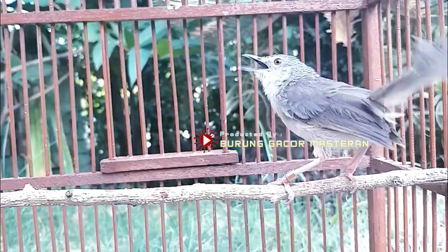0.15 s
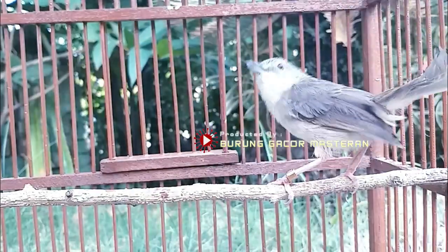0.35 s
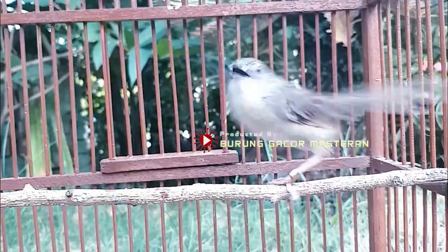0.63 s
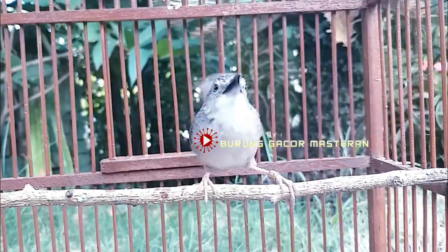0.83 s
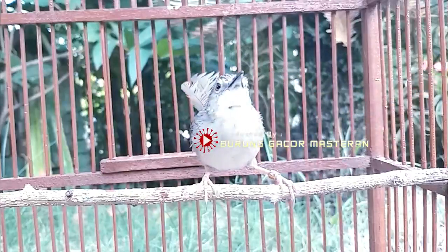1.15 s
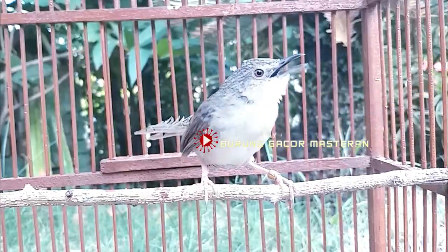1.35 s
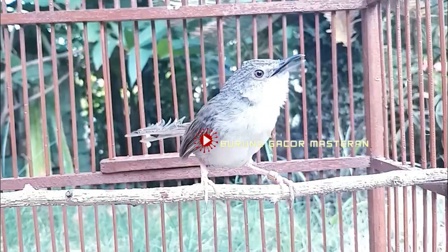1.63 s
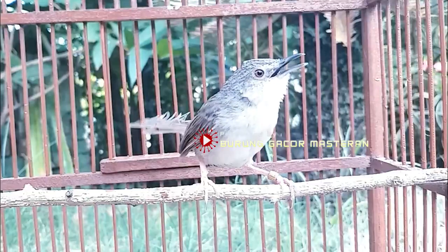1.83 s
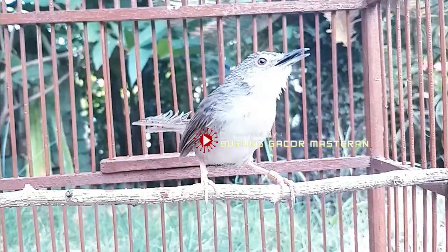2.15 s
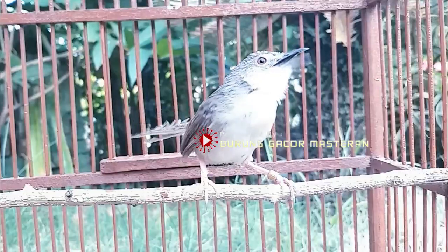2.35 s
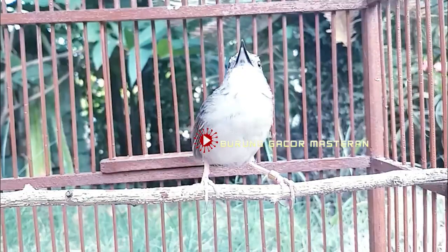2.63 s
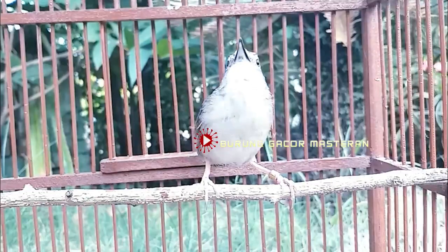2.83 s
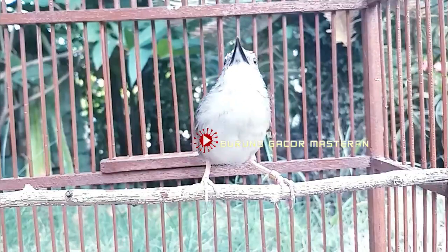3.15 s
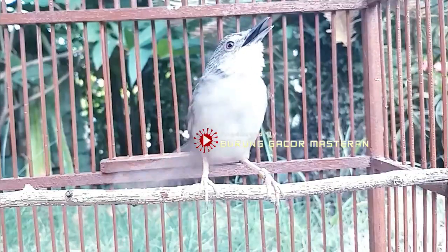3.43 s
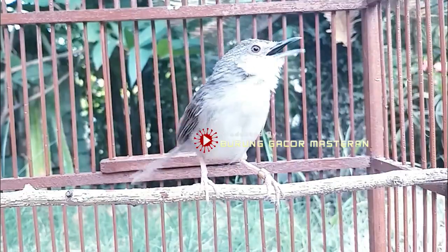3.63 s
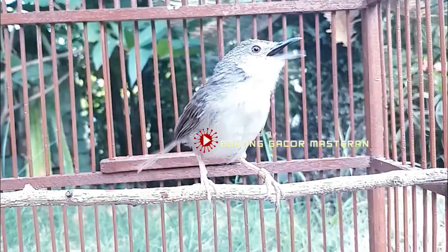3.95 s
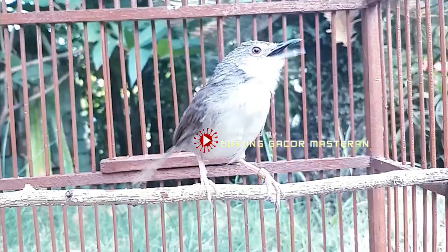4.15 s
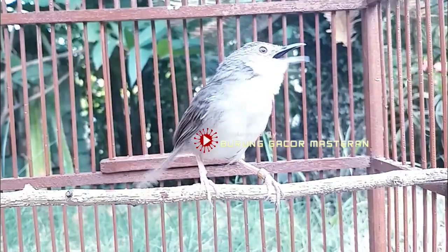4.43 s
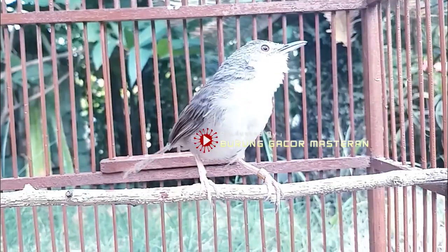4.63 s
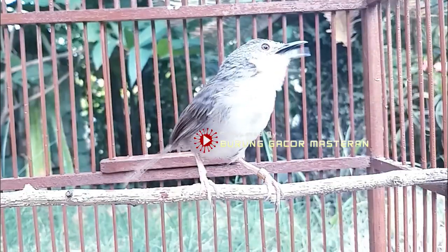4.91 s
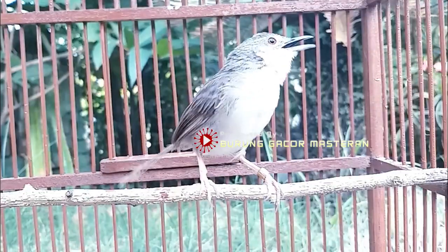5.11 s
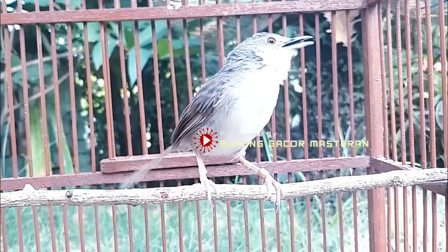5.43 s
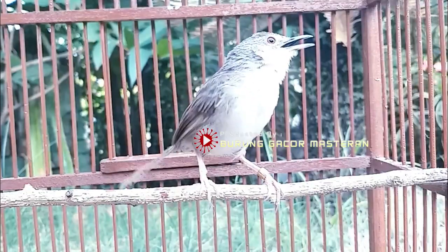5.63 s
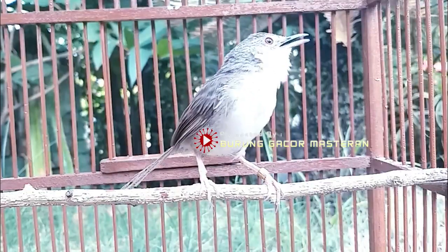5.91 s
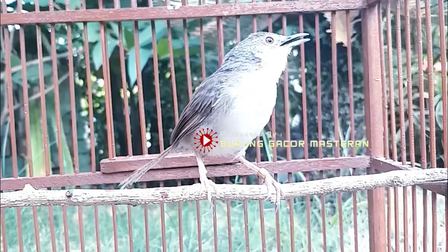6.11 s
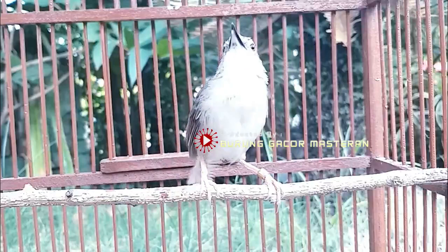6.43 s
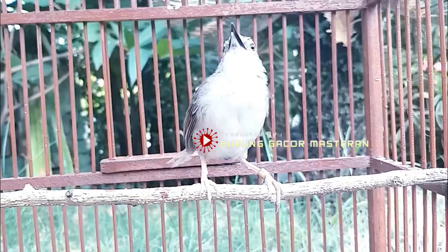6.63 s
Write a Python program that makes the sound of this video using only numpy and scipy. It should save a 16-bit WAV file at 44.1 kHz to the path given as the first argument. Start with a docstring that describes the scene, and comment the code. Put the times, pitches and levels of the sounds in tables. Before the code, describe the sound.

A small songbird in a cage sings very close to the microphone. Long high whistles swoop up, fall quickly to a sinking ledge and hook down, each answered by a fast trill of seven sharp descending chirps. The pairs repeat at a brisk, even pace with tiny gaps. Short crisp echoes from cage and walls surround it, and the loudest notes distort slightly. Behind is only very faint garden air and a far motor.

```python
"""A small caged songbird sings close by in a garden: long falling whistles and seven-note trills, mostly
in turn. Each note is one fast sweep of the syrinx: a tone with overtones and rasp, coloured by throat and
beak. Cage and nearby walls echo it, and the loudest notes clip. Behind it lie quiet outdoor air, a far
motor, three soft rustles and one distant call, all made of shaped noise."""
import sys
import numpy as np
from scipy import signal
from scipy.fft import rfft, irfft, next_fast_len
from scipy.io import wavfile
from scipy.ndimage import uniform_filter1d

SR = 44100
rng = np.random.default_rng(int(sys.argv[2]) if len(sys.argv) > 2 else 0)


def generate_wav(sig):
    """Save sig (samples, or channels by samples) to the path in sys.argv[1] as 16-bit PCM at SR."""
    pcm = np.round(np.clip(np.atleast_2d(sig).T, -1, 1) * 32767).astype(np.int16)
    wavfile.write(sys.argv[1], SR, pcm)


N = 298557
TIME = np.arange(N) / SR


def undb(db):
    """Decibels to gain."""
    return 10 ** (np.asarray(db) / 20)


def unit(x):
    """Scale to rms 1."""
    return x / np.sqrt(np.mean(x ** 2))


def response(points, hz):
    """Gain of a (Hz, dB) curve on a log-frequency axis."""
    f, db = np.transpose(points)
    return undb(np.interp(np.log(np.maximum(hz, 1)), np.log(f), db))


def noise(shape):
    """Unit noise with the spectrum shape(Hz)."""
    n = next_fast_len(N, True)
    spectrum = rfft(rng.standard_normal(n)) * shape(np.fft.rfftfreq(n, 1 / SR))
    return unit(irfft(spectrum, n)[:N])


def band(hz, width_hz):
    """Unit noise in a steep resonance."""
    return noise(lambda f: 1 / (1 + (2 * (f - hz) / width_hz) ** 2))


def swell(at, spread):
    """A bell-shaped rise and fall around its peak."""
    return np.exp(-.5 * ((TIME - at) / spread) ** 2)


def smooth(x, size, mode="reflect"):
    """Two moving averages, each size samples long."""
    return uniform_filter1d(uniform_filter1d(x, size, mode=mode), size, mode=mode)


def glide(ms, knots, values):
    """Straight lines between knots, rounded by the inertia of the muscles."""
    return smooth(np.interp(ms, knots, values), 70, mode="nearest")


def tremor(white, size):
    """White noise smoothed to a wobble of rms 1, size samples slow."""
    return unit(smooth(white, size))


def add(track, start, sound):
    """Mix a sound into a track from sample start on."""
    track[start:start + len(sound)] += sound[:len(track) - start]


# the song is already under way: a trill's last hook has just passed its top
OPENING_HOOK_S = -0.014
# the long whistles. Each row: top of the sweep in seconds, level in dB, length ratio
WHISTLES = [(0.18, 2.5, .99), (1.0325, 3, 0.93), (1.903, 1.5, 0.99), (2.757, 3.5, 0.96),
            (3.5989, 0.5, 1.018), (4.4477, 0.5, 0.99), (5.836, 1.5, 0.99), (6.7157, 3, 1.036)]
# the trills. Each row: top of the first note in seconds, level in dB, crescendo to the last note in dB,
# length ratio
TRILLS = [(0.5384, 1.5, 0, 0.99), (1.4029, -1.5, 1.2, 0.99), (2.2549, -0.28, 3, 1),
          (3.1103, 1.5, -5, 1.012), (3.9568, -0.85, -1, 1), (4.7985, -3, 2, 1.003),
          (5.3164, -1.83, 1.85, 1.032), (6.2024, 0.53, 3.5, 1)]


def songbird():
    """The song as a list of notes: whistles, trills and the closing hook of an earlier trill."""
    *hook, overtone_db = TRILL[-1][1]
    opening = note(gesture(*hook), overtone_db, TRILL_RASP_DB, OPENING_HOOK_S, db=0, length=0.87)
    whistles = [whistle(*row) for row in WHISTLES]
    trill_notes = [n for row in TRILLS for n in trill(*row)]
    return whistles + trill_notes + [opening]


# one note's shape, timed from its top before the length ratio stretches it. In order: top pitch in Hz,
# rise in ms, roundness of the top in ms, slide time constant in ms, end in ms, full pressure from in ms,
# held for in ms, pressure in dB, depth of the soft start below it in dB, overtone gain in dB
WHISTLE = (7290, 14.5, 3, 25, 190, -4.8, 173, -10, 34, -4)
# the slide levels out on a slowly sinking ledge, then hooks down
LEDGE_HZ, LEDGE_SAG_HZ_PER_MS, WHISTLE_DROOP_MS = 4040, 8.7, 23
# turbulence in the syrinx, before it follows the air pressure
WHISTLE_RASP_DB, TRILL_RASP_DB = -38, -21


def whistle(at, db, length):
    """One long whistle: the pitch swoops up, falls to a sinking ledge and hooks down."""
    *shape, overtone_db = WHISTLE
    sweep = gesture(*shape, LEDGE_HZ, LEDGE_SAG_HZ_PER_MS, WHISTLE_DROOP_MS)
    return note(sweep, overtone_db, WHISTLE_RASP_DB, at, db, length)


# the motif: an opening slur, four steep strokes, a small arch and a low hook.
# Each row: seconds into the trill before the length ratio, note shape (same columns as the whistle)
TRILL = [(0, (7332.5, 15.5, 3, 46.5, 43, -4, 30, -8.5, 30.5, -1.5)),
         (0.064, (7899.5, 8.5, 1, 27, 40.5, 5.5, 8, -4, 24, 1.5)),
         (0.1156, (8104, 8.5, 1, 21, 35, 6, 5, -1, 33, -0.5)),
         (0.1651, (8097.5, 10.5, 1, 21, 36, 6.5, 4, -0.2, 27, 0.5)),
         (.213, (7904, 9.5, 1.5, 15, 28, 6, -1.5, 0.5, 27, 4)),
         (.2598, (5648.5, 13.5, 2.5, 24, 22, 1.5, 5.5, -6.5, 13.5, -0.5)),
         (0.3078, (4174.5, 19, 9, 32.5, 29, 1, -0.5, -2.5, 18, 8))]


def trill(at, db, crescendo_db, length):
    """The seven sweeps of the motif, swelling or fading towards the end."""
    notes = []
    for after, (*shape, overtone_db) in TRILL:
        note_db = db + crescendo_db * (after / TRILL[-1][0]) ** 2
        notes.append(note(gesture(*shape), overtone_db, TRILL_RASP_DB, at + after * length, note_db, length))
    return notes


# start pitch as a ratio of the top; the pitch droops by this share as the air runs out
START_RATIO, DROOP_SHARE, DROOP_MS = .38, .33, 10
# pressure slopes before the length ratio
ATTACK_DB_PER_MS, RELEASE_DB_PER_MS = 3, 1.29


def gesture(top_hz, rise, roundness, slide, end, full, hold, db, soft_db, ledge_hz=0, sag=0, droop=DROOP_MS):
    """Pitch and air pressure through one note: rows of (ms from the top, Hz, dB)."""
    ms = np.linspace(-rise, end, 400)
    away = np.hypot(ms, roundness) - abs(roundness)
    up = top_hz * START_RATIO ** (away / away[0])
    down = ledge_hz - sag * ms + (top_hz - ledge_hz) * np.exp(-away / slide)
    spent = np.maximum(1 - (end - ms) / droop, 0)
    hz = np.where(ms < 0, up, down) * (1 - DROOP_SHARE * spent * np.sqrt(spent))
    attack = np.clip(ATTACK_DB_PER_MS * (full - ms), 0, soft_db)
    release = RELEASE_DB_PER_MS * np.maximum(ms - full - hold, 0)
    return np.transpose([ms, hz, db - attack - release])


LONGEST_NOTE = SR // 4  # samples


def note(sweep, overtone_db, rasp_db, at, db, length, jitter=.002, shimmer_db=.4):
    """One sung sweep: first sample, sound sent ahead to the microphone, sound sent all around."""
    knots, hz, pressure_db = np.transpose(sweep)
    knots = knots * length
    first, last = (int((at + knot / 1000) * SR) for knot in (knots[0], knots[-1]))
    samples = np.arange(first, last)[:LONGEST_NOTE]
    ms = (samples / SR - at) * 1000
    chance = rng.standard_normal((4, LONGEST_NOTE))[:, :len(samples)]
    hz = glide(ms, knots, hz) * (1 + jitter * tremor(chance[0], size=20))
    pressure = undb(glide(ms, knots, pressure_db) + db + shimmer_db * tremor(chance[1], size=40))
    fade = np.clip(np.minimum(ms - ms[0], ms[-1] - ms) / 2, 0, 1)  # 2 ms at each end
    voice = fade * syrinx(hz, pressure, overtone_db, rasp_db, chance[2:])
    return samples[0], *head(voice, at)


# the overtones. Each row: multiple of the pitch, level in dB before the note's overtone gain
OVERTONES = [(2, -28.5), (3, -43.5), (4, -49.5), (5, -55.5)]
OVERTONE_POWER = .55  # overtones grow as this power of the air pressure
HALF_TONE_DB, THREE_HALVES_DB = -40, -34  # relative to the fundamental
RASP_HZ, TOP_HZ = 5100, 15600  # rasp lowpass; top of the whole sound


def syrinx(hz, pressure, overtone_db, rasp_db, chance, flutter_db=15):
    """The vibrating syrinx: fundamental, faint half tones, fluttering overtones and turbulent rasp."""
    phase = 2 * np.pi * np.cumsum(hz) / SR
    overtones = sum(undb(level_db + overtone_db) * (k * hz < TOP_HZ) * np.sin(k * phase)
                    for k, level_db in OVERTONES)
    overtones = overtones * (1 + undb(rasp_db + flutter_db) * tremor(chance[0], size=12))
    # alternate cycles differ a little, which adds faint half tones
    halves = undb(HALF_TONE_DB) * np.sin(phase / 2) + undb(THREE_HALVES_DB) * np.sin(phase * 1.5)
    # the rasp is dull and swells a little less than the tone
    dull_noise = signal.lfilter(*signal.butter(1, RASP_HZ, fs=SR), chance[1])
    rasp = undb(rasp_db) * pressure ** (3 / 4) * dull_noise
    return pressure * (np.sin(phase) + halves) + pressure ** OVERTONE_POWER * overtones + rasp


# resonances of throat and beak. Each row: frequency in Hz, gain in dB
TRACT = [(900, -57), (1400, -17), (2000, -19), (2600, -8.5), (3300, -6), (4300, -2), (6000, -1.5),
         (7200, 1), (8000, -3.5), (9600, -2.5), (11500, 8), (14000, 15.5), (15500, -7.5)]
# the bird turns on its perch. Each row: time in seconds, facing (0 side on, 1 beak towards the microphone)
FACING = [(0, 0.0082), (.7, 0.43), (1.05, 0.78), (1.5, 0.033), (2.35, 0), (2.8, 0.89), (3.6, 0.0067),
          (4.5, 0.031), (5.9, 0.2), (6.35, 0.31), (6.75, 0.91)]
# side on and facing: the beak's treble beam, and lag and share of the nearest reflection
BEAM_DB, REFLECTION_MS, REFLECTION_SHARE = (-1.77, 7), (0.754, 0.8172), (0.45, 0.23)
BEAM_HZ = 6400  # the open beak beams the treble above this


def head(voice, at):
    """Throat, beak and nearest reflection colour the voice; the beam shapes only the sound sent ahead."""
    facing = np.interp(at, *np.transpose(FACING))
    beam_db, lag_ms, share = (np.interp(facing, [0, 1], ends)
                              for ends in (BEAM_DB, REFLECTION_MS, REFLECTION_SHARE))
    size = next_fast_len(2 * len(voice), True)
    f = np.fft.rfftfreq(size, 1 / SR)
    beam = undb(beam_db * f ** 20 / (f ** 20 + BEAM_HZ ** 20))
    # the sweep runs through the notches of the reflection, so its level flutters
    comb = 1 - share * np.exp(-2j * np.pi * f * lag_ms / 1000)
    spectrum = rfft(voice, size) * response(TRACT, f) * comb
    return irfft(spectrum * beam, size), irfft(spectrum, size)


def decay(t, t60_s, build_s):
    """Reverberant envelope of unit energy: a linear build-up on an exponential decay."""
    envelope = np.exp(-np.log(1000) * t / t60_s) * np.minimum(t / build_s, 1)
    return envelope / np.linalg.norm(envelope)


NEAR_DB, NEAR_T60_S = -14, 0.12
# scattered echoes of bars, cage frame and walls. Each row: mean delay in ms, random spread of the delay
# in ms, level in dB
ECHOES = [(2.689, 0.22, -23.5), (3.6, 0.434, -13.5), (8.5, 2.3, -17.5), (15.7, 0.8, -26.5),
          (39.7, 1.2, -34)]


def cage():
    """Impulse response of a few crisp echoes and a short haze, drawn anew at each call."""
    t = np.arange(SR // 8) / SR
    impulse = undb(NEAR_DB) * decay(t, NEAR_T60_S, build_s=0.0027) * rng.standard_normal(len(t))
    for delay_ms, spread_ms, db in ECHOES:
        lag = (delay_ms + spread_ms * rng.standard_normal()) / 1000
        impulse += undb(db) * np.sinc((t - lag) * SR)
    return impulse


YARD_DB, YARD_T60_S, YARD_TOP_HZ = -32, 0.63, 5340  # level before the lowpass


def yard(song):
    """The faint, dull tail thrown back by walls and leaves further off."""
    t = np.arange(int(.7 * SR)) / SR
    tail = undb(YARD_DB) * decay(t, YARD_T60_S, build_s=0.061) * rng.standard_normal(len(t))
    dull_tail = signal.lfilter(*signal.butter(2, YARD_TOP_HZ, fs=SR), tail)
    return signal.oaconvolve(song, dull_tail)[:len(song)]


# another bird far off. In order: peak in seconds, spread in seconds, pitch in Hz, level in dB
FAR_CALL = (6.61, .04, 2800, -48)


def far_call():
    """One distant call: a narrow band of noise that swells and fades."""
    at, spread, hz, db = FAR_CALL
    return undb(db) * swell(at, spread) * band(hz, width_hz=50)


# soft rustles between the phrases. Each row: peak in seconds, spread in seconds, centre in Hz, width in Hz,
# level in dB
RUSTLES = [(5.22, 0.079, 12500, 1500, -59), (5.72, 0.028, 4800, 1610, -43),
           (6.136, 0.041, 12700, 1000, -62.5)]


def rustles():
    """Soft rustles: short swells of band noise."""
    return sum(undb(db) * swell(at, spread) * band(hz, width) for at, spread, hz, width, db in RUSTLES)


# the motor's level. Each row: time in seconds, level in dB
MOTOR = [(0, -79.5), (3.6, -66.5), (4.4, -67.5), (5.4, -60.5), (6.77, -63)]
MOTOR_HZ, MOTOR_WIDTH_HZ = 94, 120


def motor():
    """A far motor: a low band of noise whose level drifts."""
    return undb(np.interp(TIME, *np.transpose(MOTOR))) * band(MOTOR_HZ, MOTOR_WIDTH_HZ)


# colour of the outdoor air. Each row: frequency in Hz, relative spectral level in dB
GARDEN = [(25, -11), (85, -6.5), (160, -5.5), (300, -13.5), (700, -13.5), (1500, -15.5), (4000, -26.5),
          (7500, -22.5), (9500, -12), (11000, -20), (15000, -40)]
GARDEN_DB = -70


def air():
    """Unit noise with the colour of quiet outdoor air."""
    return noise(lambda f: response(GARDEN, f))


def garden():
    """Gently wavering outdoor air, a far motor, rustles and one distant call."""
    waver_db = 1.0 * tremor(rng.standard_normal(N), size=9000)
    return undb(GARDEN_DB + waver_db) * air() + motor() + rustles() + far_call()


def scene(side_db=-12, air_side_db=-86):
    """The bird is dead ahead; only the echoes and the air differ between left and right."""
    lead = SR // 2  # room for notes that start before time zero
    song, around, echo, side_echo = np.zeros((4, N + 2 * lead))
    for start, ahead, spread in songbird():
        add(song, lead + start, ahead)
        add(around, lead + start, spread)
        # each note gets its own cage echoes
        add(echo, lead + start, signal.fftconvolve(spread, cage()))
        add(side_echo, lead + start, signal.fftconvolve(spread, cage()))
    mid = (song + echo + yard(around))[lead:lead + N] + garden()
    side = undb(side_db) * (side_echo + yard(around))[lead:lead + N]
    side += undb(air_side_db) * air()
    return np.array([mid + side, mid - side])


# the converter clips a little sooner on one side of the wave than on the other
CEILING, TROUGH = .88, -.99


def record(dry):
    """The converter clips the loudest sweeps, folding soft thumps into the bass; the top is cut."""
    clipped = np.clip(dry, TROUGH, CEILING)
    return signal.sosfiltfilt(signal.ellip(8, .1, 60, TOP_HZ, fs=SR, output="sos"), clipped)


dry = scene()
out = record(dry)
generate_wav(out)
```